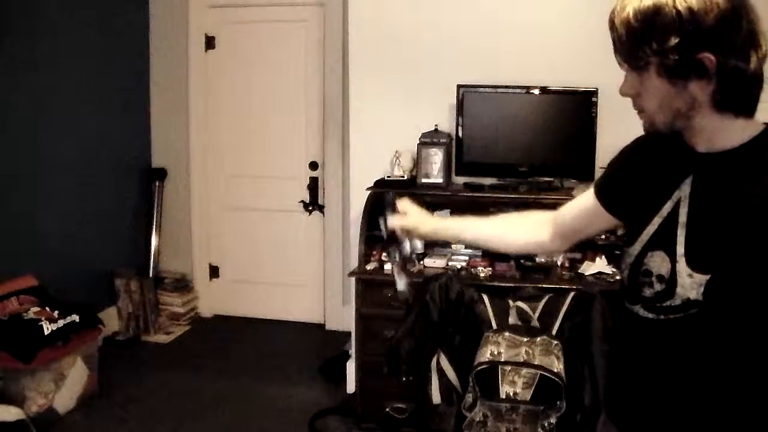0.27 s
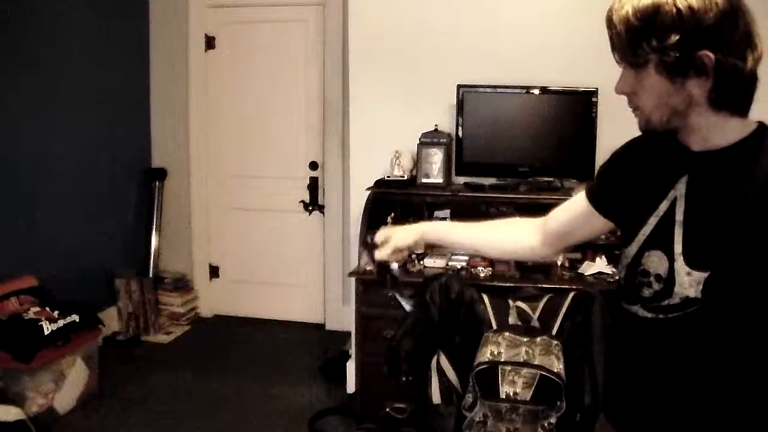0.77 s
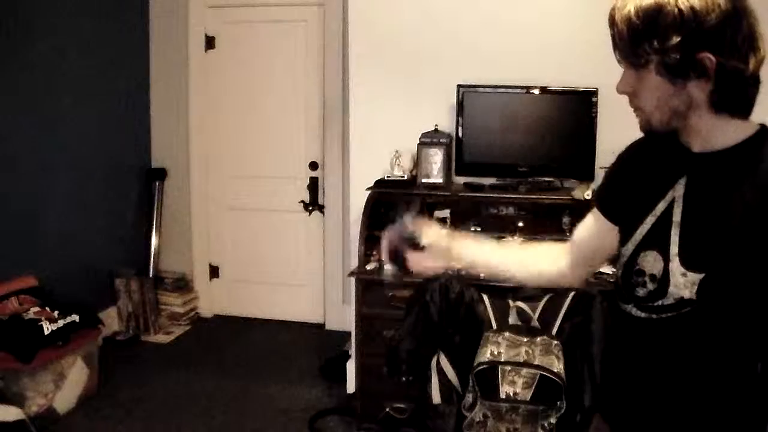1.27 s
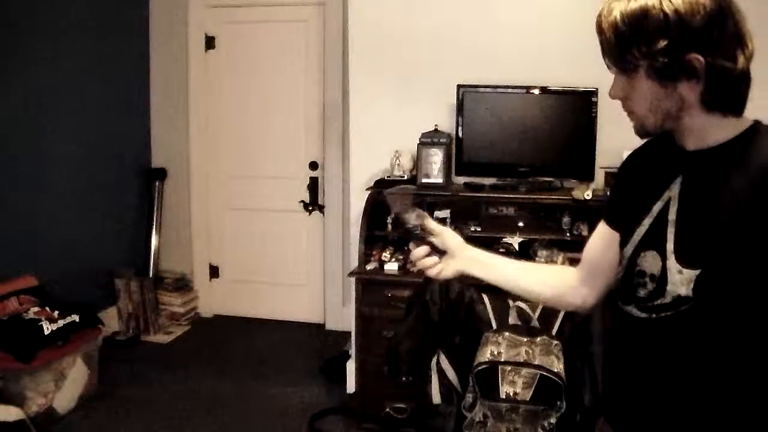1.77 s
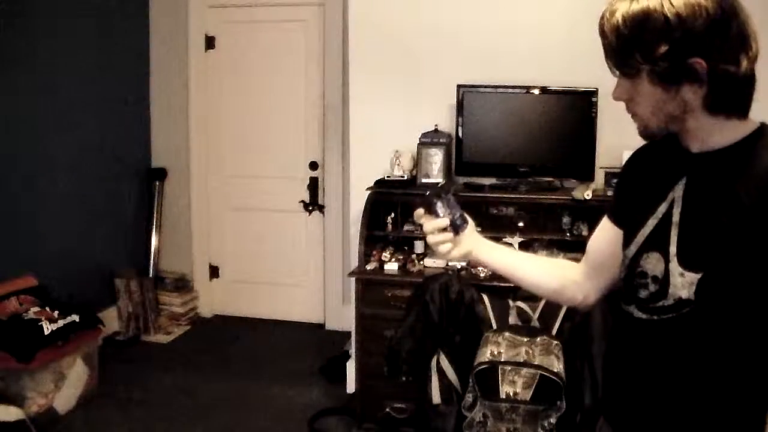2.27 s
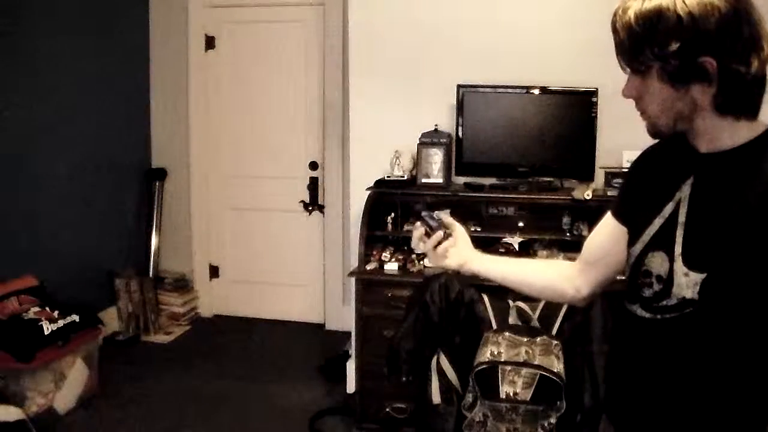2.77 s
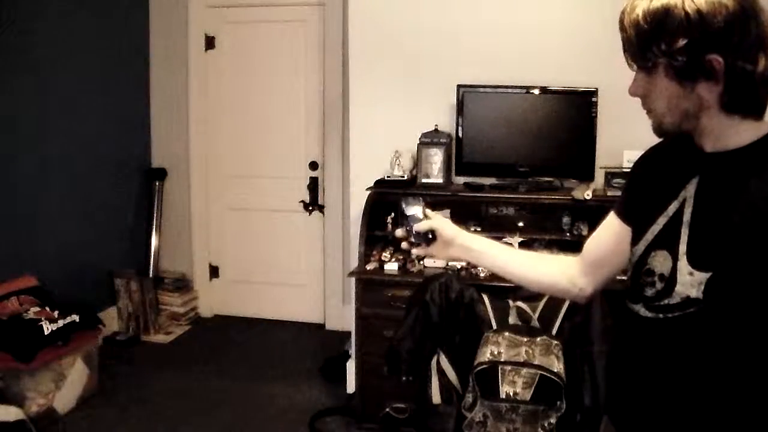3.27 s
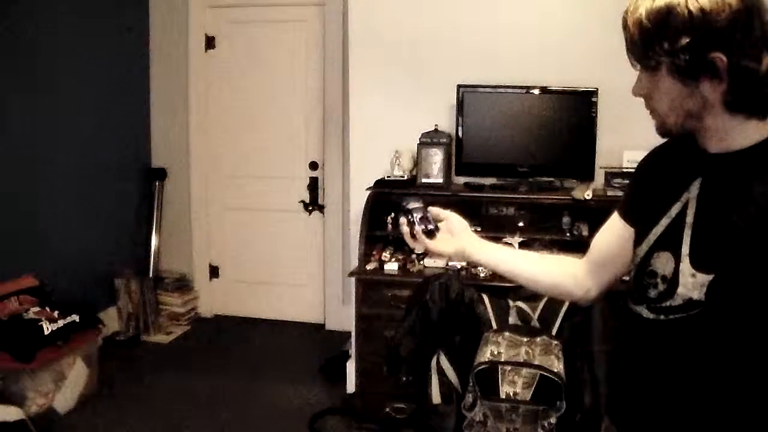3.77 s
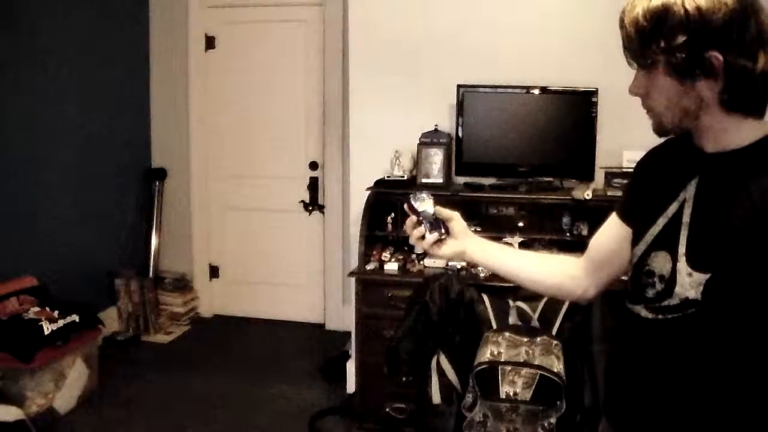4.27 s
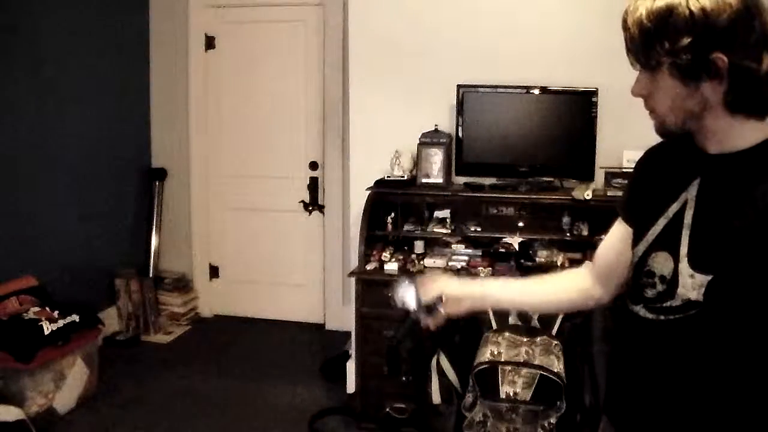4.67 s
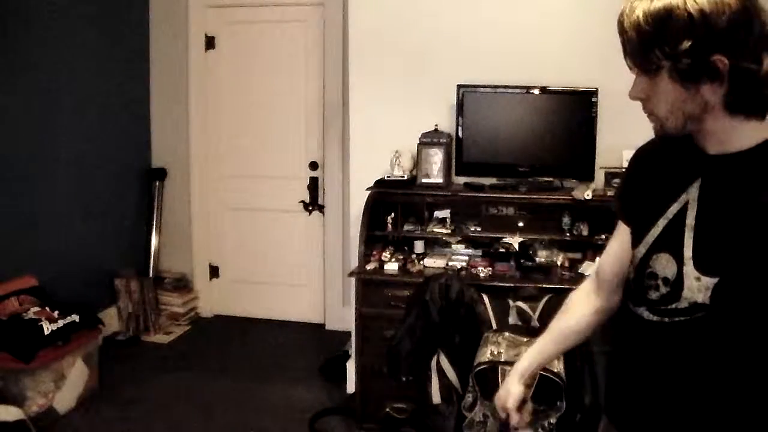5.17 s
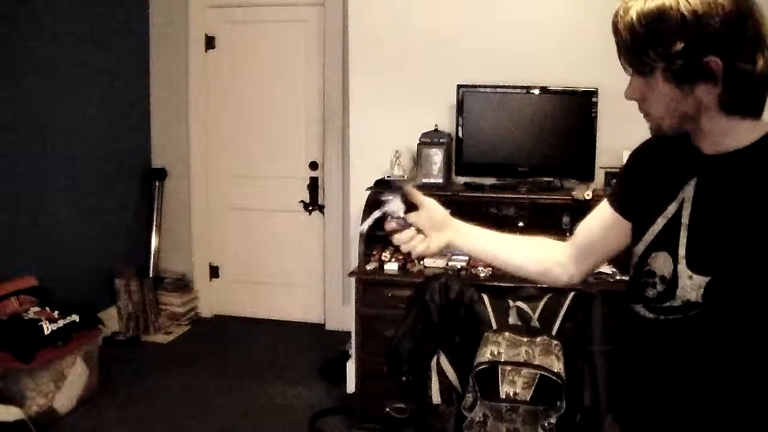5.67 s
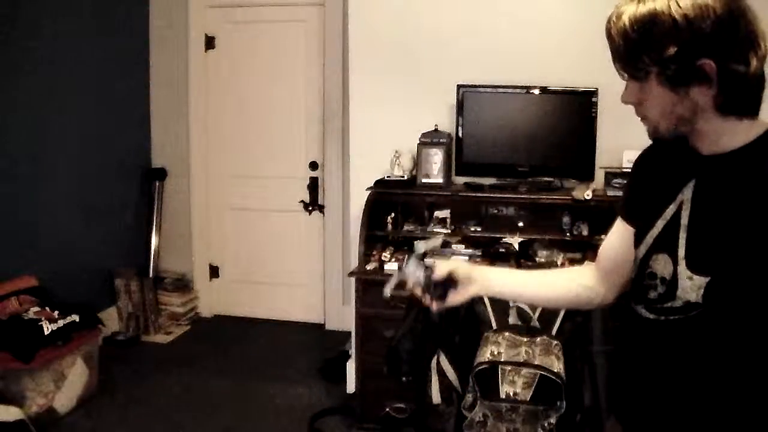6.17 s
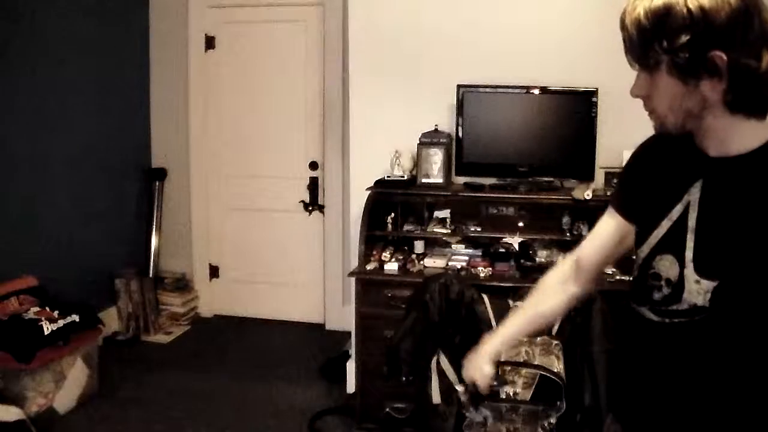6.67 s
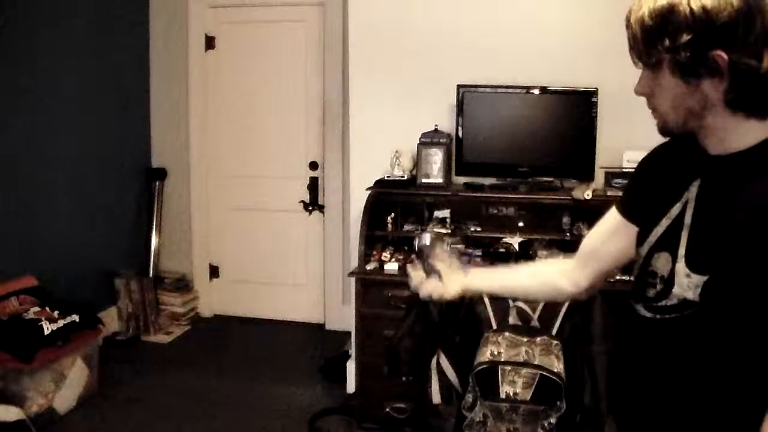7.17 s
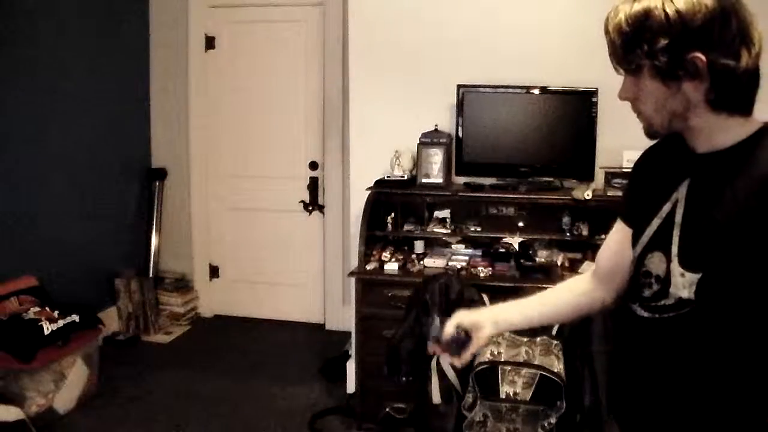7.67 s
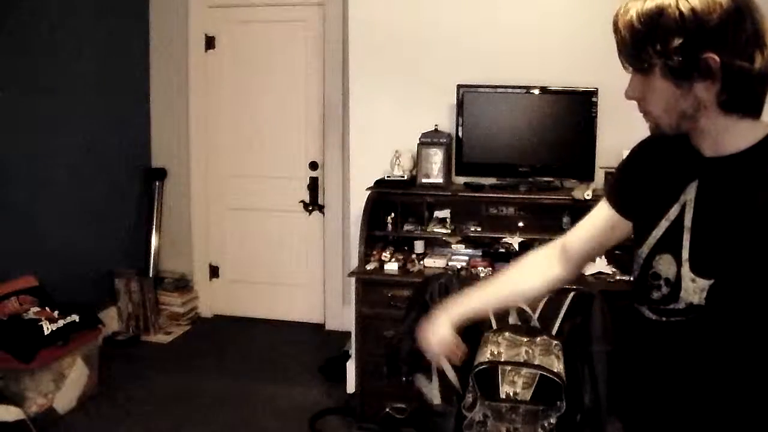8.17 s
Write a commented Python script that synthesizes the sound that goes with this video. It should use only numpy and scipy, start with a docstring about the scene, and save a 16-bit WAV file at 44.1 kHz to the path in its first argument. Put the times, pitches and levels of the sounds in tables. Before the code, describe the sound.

A hinged plastic toy is flipped open and shut by hand, clacking and rattling in quick bursts over a low room hum.

```python
"""A low machine hum and a rush of air fill a small room. A metre or two away, a hinged plastic toy is
flipped open and shut by hand: light clicks, then from 1.3 s a flurry of clacks, the loose hinge rattling
in the swings, up to a hard snap at 2 s with a dull wash after it. Sparser, hollower knocks follow, and the
parts tap in the fingers. Flat blows stop dead; glancing ones chatter. Two more hard snaps land at 5.9
and 7.3 s, the whole sound dipping briefly after each of the three, and a last click comes at 8.1 s."""
import sys
import numpy as np
from scipy import signal
from scipy.fft import rfft, irfft
from scipy.io import wavfile

SR = 44100
rng = np.random.default_rng(int(sys.argv[2]) if len(sys.argv) > 2 else 0)


def put_to_file(sound):
    """Save the sound as 16-bit audio at rate SR, in the file named by the first command-line argument."""
    columns = np.atleast_2d(sound).T  # one column per channel
    safe = np.clip(columns, -1, 1)
    whole_steps = np.round(safe * 32767)
    wavfile.write(sys.argv[1], SR, whole_steps.astype(np.int16))


N = 371322
TIME = np.arange(N) / SR
FREQS = np.fft.rfftfreq(N, 1 / SR)


def amp(db):
    """Decibels to gain."""
    return 10 ** (np.asarray(db) / 20)


def pan(left_db):
    """Stereo gains: the left goes up by left_db, the right down by as much."""
    return amp([[left_db], [-left_db]])


def curve_at(points, hz):
    """Reads a curve on a log-frequency axis."""
    point_hz, value = np.transpose(points)
    return np.interp(np.log(hz + 1), np.log(point_hz + 1), value)


def bell(hz, centre_hz, octaves):
    """An EQ bell of height 1."""
    return np.exp(-(np.log2((hz + 1) / centre_hz) / octaves) ** 2)


def add(mix, start_s, sounds):
    """Mixes sounds in at start_s."""
    part = mix[:, max(round(start_s * SR), 0):][:, :sounds.shape[1]]
    part += sounds[:, :part.shape[1]]


def noise(spectrum):
    """Two unrelated noises with the given spectrum, rms 1."""
    shaped = irfft(rfft(rng.standard_normal((2, N))) * spectrum, N)
    return shaped / np.sqrt(np.mean(shaped ** 2) + 1e-20)


def stereo(two, correlation):
    """Blends two unrelated signals, as mid and side, into left and right."""
    mid = two[0] * np.sqrt((1 + correlation) / 2)
    side = two[1] * np.sqrt((1 - correlation) / 2)
    return np.array([mid + side, mid - side])


# The tone of the air. Each row: frequency in Hz, relative spectral level in dB.
AIR_SPECTRUM = [(20, 4), (45, 2.5), (80, -7), (150, -8), (220, -5), (330, -6), (480, -9), (700, -10),
                (900, -12.5), (1500, -17.5), (3000, -22), (5000, -29), (14000, -80)]
# Its slow level ride. Each row: time in seconds, gain in dB.
AIR_RIDE = [(0, 1), (3.3, 0.5), (4.8, -0.1), (5.8, -1), (7.2, -1), (8.4, 0)]


def air(level_db=-54):
    """A dark, narrow bed of rushing air that drifts a little in level."""
    rush = amp(level_db) * noise(amp(curve_at(AIR_SPECTRUM, FREQS)))
    ride = amp(np.interp(TIME, *np.transpose(AIR_RIDE)))
    return stereo(rush * ride, correlation=0.82) * pan(-0.14)


# A running machine's resonances. Each row: centre in Hz, width in Hz, rms level in dB before panning.
HUM_BANDS = [(30.35, 5.4, -57.5), (58.3, 11, -61.5), (99.3, 8.5, -70.5), (308, 18, -67), (369.6, 13, -67),
             (421.6, 16, -68.5), (532, 14, -71.5), (717, 19, -66.5)]


def machine_hum():
    """Narrow resonant bands of noise make a wavering hum, almost mono."""
    power = 0
    for hz, width, db in HUM_BANDS:
        band = 1 / (1 + (2 * (FREQS - hz) / width) ** 2) ** 2
        power = power + amp(db) ** 2 * band / band.sum()
    hum = np.sqrt(power.sum()) * noise(np.sqrt(power))
    return stereo(hum, correlation=0.99) * pan(0.5)


# The tones of the machine's motor. Each row: pitch in Hz, rms level in dB before panning.
MOTOR_TONES = [(59, -60.5), (118.2, -64.5)]


def motor(wander_cycles=0.1):
    """A steady low drone to the left, its phase wandering a little."""
    wander_s = wander_cycles * noise(1 / (1 + FREQS ** 2))[0] / MOTOR_TONES[0][0]
    drone = sum(amp(db) * np.sin(2 * np.pi * hz * (TIME + wander_s)) for hz, db in MOTOR_TONES)
    return np.sqrt(2) * drone * pan(3)


def ticks(size, per_s, spread_db):
    """Impulses at random moments, of uneven force."""
    lands = rng.random(size) < per_s / SR
    force = amp(spread_db * np.clip(rng.standard_normal(size), -2, 2))
    return lands * force * rng.choice([-1, 1], size)


# The room's decay. Each row: frequency in Hz, time to fall 60 dB in seconds.
ROOM_DECAY = [(300, 0.12), (1200, 0.29), (2800, 0.39), (5500, 0.36), (9000, 0.35), (14000, 0.2)]


def room(sound, build_s=0.0017, early_db=-3, early_s=0.0043, mic_spacing_m=0.025):
    """Early reflections, then a diffuse tail that two close microphones share only below the treble."""
    t = np.arange(SR * 3 // 4) / SR
    early = np.array([ticks(len(t), per_s=500, spread_db=3) for _ in range(2)]) * np.exp(-t / early_s)
    echoes = rng.standard_normal((2, len(t))) + amp(early_db) * np.sqrt(SR / 500) * early
    fade_in = 1 - np.exp(-(t / build_s) ** 2)
    hz, age, bands = signal.stft(echoes * fade_in, SR, nperseg=256)
    wavelengths_apart = mic_spacing_m * hz[:, None] / 343
    decay = amp(-60 * age / curve_at(ROOM_DECAY, hz)[:, None])
    bands = stereo(bands, np.sinc(2 * wavelengths_apart)) * decay
    tail = signal.istft(bands, SR, nperseg=256)[1]
    return signal.fftconvolve(sound[None], tail / np.linalg.norm(tail.mean(0)), axes=1)[:, :N]


# The EQ of a plain plastic contact. Each row: frequency in Hz, gain in dB.
CONTACT_EQ = [(100, -18), (400, -18.5), (800, -16), (1300, -6), (1900, -7), (2700, -1), (4100, 1.5),
              (6000, 1), (8200, -7), (10500, -7), (14000, -11.5)]
BODY_HZ = 1966  # the toy's hollow note


def colour(edge_db, body_db=0, hinge_db=0, body_hz=BODY_HZ, edge_hz=7000, hinge_hz=2880, thump_hz=520):
    """A contact's filter: hollow body and thump if flat, bright edge if glancing, and the hinge's note."""
    hz = abs(np.fft.fftfreq(1024, 1 / SR))
    edge = 1 - 1 / (1 + (hz / edge_hz) ** 6)
    body = bell(hz, body_hz, octaves=0.53) + 0.33 * bell(hz, thump_hz, octaves=1.0)
    hinge = bell(hz, hinge_hz, octaves=0.24)
    eq_db = curve_at(CONTACT_EQ, hz) + edge_db * edge + body_db * body + hinge_db * hinge
    minimum_phase = np.exp(np.conj(signal.hilbert(np.log(amp(eq_db)))))  # no ring ahead of the hit
    return np.fft.ifft(minimum_phase).real


def ringing(level_db, light_touch_db=-52.5):
    """Ring gain in dB: light touches leave the parts free; hard blows press them together and damp them."""
    return -3 - 0.33 * max(level_db - light_touch_db, 0)


# The shell's modes. Each row: pitch in Hz, relative level in dB, time to fall 60 dB in seconds.
SHELL_MODES = [(1990, -28.5, 0.013), (2214, -34, 0.011), (2530, -26.5, 0.011), (2701, -25.5, 0.027),
               (2987, -33, 0.028), (3242, -28.5, 0.03), (3530, -24, 0.0093), (4680, -31, 0.027),
               (4950, -33.5, 0.027), (5440, -29.5, 0.019), (5828, -28, 0.052), (6800, -32, 0.03),
               (8300, -49, 0.011), (9740, -32, 0.087)]


def shell(blows, tone, ring_db, crack_s=0.0014, scatter_db=4, detune=0.012):
    """Blows crack and ring the plastic shell; returns four directions, each of energy 1."""
    t = np.arange(2048) / SR
    hz, db, t60 = np.transpose(SHELL_MODES)[:, :, None]
    place, grip = rng.standard_normal((2, len(SHELL_MODES), 1))
    envelopes = amp(ring_db + db + scatter_db * place - 60 * t / t60)
    ring = (envelopes * np.sin(2 * np.pi * hz * (1 + detune * grip) * t)).sum(0)
    # the crack's crowded, quickly damped modes add up differently in each direction
    crack_decay = np.exp(-2 * t / crack_s)
    crack_power = abs(signal.fftconvolve(blows ** 2, crack_decay / crack_decay.sum()))
    crack = np.sqrt(crack_power) * np.clip(rng.standard_normal((4, len(crack_power))), -2, 2)
    sounds = signal.fftconvolve(crack + signal.fftconvolve(blows, ring), tone[None], axes=1)
    return sounds / np.linalg.norm(sounds, axis=1, keepdims=True)


GLANCING_S, FLAT_S = 0.0073, 0.0023  # chatter decay of a light glancing blow and a light flat one
FLAT_DB, FLAT_RANGE_DB = 6.5, 3  # body boost at which a blow turns flat, and how gradually
HARD_DB, SNAP_DB = -22.5, -27  # a hard blow halves its chatter; a snap lifts the hollow note
HIT_GAIN = np.sqrt(SR / 100)  # makes a hit's level its rms over 10 ms


def contact(db, body_db, edge_db, rebound=0.56, soft_attack_s=0.0075, size=2048):
    """A blow, then chatter in the play of the hinge: the flatter and harder, the sooner it stops."""
    t = np.arange(size) / SR
    chatter_s = FLAT_S + (GLANCING_S - FLAT_S) / (1 + np.exp((body_db - FLAT_DB) / FLAT_RANGE_DB))
    chatter_s /= 1 + amp(db - HARD_DB) ** 2
    attack = 1 / (1 + (chatter_s / soft_attack_s) ** 4)  # long chatter starts softly
    envelope = (attack + (1 - attack) * 2 * t / chatter_s) * np.exp(-t / chatter_s)
    blows = attack * (t == 0) + rebound * ticks(size, per_s=1500, spread_db=4.9) * envelope
    # a hard snap is a shorter contact, so its hollow note sits higher
    rise_octaves = 0.26 / (1.5 + np.exp(SNAP_DB - db))
    tone = colour(edge_db, body_db, body_hz=BODY_HZ * 2 ** rise_octaves)
    return amp(db) * HIT_GAIN * shell(blows, tone, ringing(db))


# Changes of grip. Each row: start and end in seconds, middle tap level in dB, body boost in dB.
GRIP_CHANGES = [(2.685, 2.715, -54, -1), (3.738, 3.82, -56, 18), (4.248, 4.269, -50, 7),
                (4.725, 4.787, -47.5, 4), (5.729, 5.801, -54, -2), (7.093, 7.11, -45.5, 2),
                (7.699, 7.876, -54, 3)]


def grip_taps(per_s=20, spread_db=4):
    """The parts tap lightly and unevenly as the fingers change grip."""
    out = np.zeros((4, N))
    for start, end, db, body_db in GRIP_CHANGES:
        count = max(round((end - start) * per_s), 1)
        for k, (lag, force) in enumerate(rng.random((count, 2))):
            tap = contact(db + spread_db * (2 * force - 1), body_db, edge_db=-3.5)
            add(out, start + (end - start) * (k + lag) / count, tap)
    return out


# Hinge rattles, and one dull wash that lingers after the hard snap at 2 s as the level returns.
# Each row: start and end in seconds, level in dB, treble boost in dB.
RATTLES_AND_WASH = [(0.049, 0.688, -60.5, -4), (0.814, 0.989, -57, 2), (1.263, 1.451, -45.5, -1),
                    (1.576, 1.679, -45.5, 5), (1.685, 1.781, -42, 13), (1.83, 2.027, -51.5, 6.5),
                    (2.049, 2.294, -45.5, -20), (5.277, 5.43, -57, 0), (5.577, 5.671, -58.5, -9.5),
                    (5.853, 5.906, -30, 9), (7.125, 7.272, -48, -2.5), (7.321, 7.466, -49, 2),
                    (8.141, 8.243, -50, 1)]


def rattles_and_wash(gentle_db=-60, damping=0.4):
    """The loose hinge ticks densely on the shell, force damping its ring; dulled ticks make the wash."""
    out = np.zeros((4, N))
    for start, end, db, edge_db in RATTLES_AND_WASH:
        size = round((end - start) * SR)
        ticking = ticks(size, per_s=1000, spread_db=3.5) * signal.windows.tukey(size, 0.5)
        tone = colour(edge_db, hinge_db=10 - damping * (db - gentle_db))
        add(out, start, amp(db) * np.sqrt(size) * shell(ticking, tone, ringing(db) - 4))
    return out


def lead_in(blow_db, edge_db, swell_s=0.0055, middling_blow_db=-35, size=1024):
    """A faint swell of fine ticks leads into a clack and softens its attack; returns lead time, sound."""
    until_blow_s = np.arange(size)[::-1] / SR
    swell = ticks(size, per_s=2500, spread_db=2.5) * np.exp(-until_blow_s / swell_s)
    db = -49.5 + 0.84 * (blow_db - middling_blow_db)
    return until_blow_s[0], amp(db) * HIT_GAIN * shell(swell, colour(edge_db, hinge_db=5), ringing(db))


# Brief dips of the whole mix. Each row: start in seconds, depth in dB, hold and release in seconds.
LEVEL_DIPS = [(2.0453, 10, 0.017, 0.35), (5.9053, 14.5, 0.45, 0.12), (7.286, 6.5, 0.4, 0.24)]


def dip_gain(instant_share=0.59, fall_s=0.003):
    """The level drops, most of the way at once, holds, and comes back."""
    cut_db = 0
    for start, depth_db, hold_s, release_s in LEVEL_DIPS:
        corners = start + np.cumsum([-0.0005, 0.0005, fall_s, hold_s, release_s])
        cut_db = cut_db + depth_db * np.interp(TIME, corners, [0, instant_share, 1, 1, 0])
    return amp(-cut_db)


# The halves meeting. Each row: start in seconds, level in dB, body boost in dB, treble boost in dB.
CLACK_HITS = [(0.213, -48.5, -8, 0), (0.278, -43.5, -3.5, 4), (0.323, -44, 2, -4), (0.433, -47.5, -13, 1),
              (0.523, -49.5, 5, 2), (0.896, -45.5, -5, -4), (0.941, -47, -15, -2), (1.274, -38, -7, 8),
              (1.298, -37.5, -3, 4), (1.335, -39.5, -10, 10), (1.36, -35.5, 3, -9), (1.3817, -32, -3, 13),
              (1.399, -31, 0, 2.5), (1.568, -26.5, -4, 4.5), (1.611, -40, -3, -6), (1.695, -35, -8, -5),
              (1.732, -31.5, -5, 2), (1.824, -33.5, -7, 11), (1.998, -28, -3, 3.5), (2.0441, -27.5, 17, 1),
              (2.047, -24, 9, 3.5), (2.6279, -44, 5, -2), (2.844, -43, 31, -13), (2.8485, -35, 21, 5),
              (2.855, -32, 2, 5), (2.957, -35, 18.5, -3), (3.6508, -51.5, 10, -33),
              (4.074, -44.5, 14, -4.5), (4.0804, -38, 4.5, 3), (4.1523, -31, 14.5, -0.5),
              (4.7933, -34, 10, -3), (4.826, -29.5, 8, 2.5), (4.926, -28, 12.5, 7.5), (4.932, -36.5, 0, 15),
              (5.2038, -44, 12, -9), (5.212, -39.5, 0, 6), (5.2897, -40, 0, 3.5), (5.5357, -42.5, 7, -1),
              (5.5913, -45, 2.5, 1), (5.81, -46, -1.5, 1), (5.8568, -29, 3, 11), (5.905, -23, 8, 3.5),
              (6.535, -51.5, 3, 6), (6.912, -47, -2, 4), (6.9971, -42, 7, 2), (7.131, -44.5, 5, 10),
              (7.2031, -38, 4, 5), (7.2863, -26, 12, 2), (7.3075, -32, 7.5, -0.5), (7.4508, -29.5, 9, 3),
              (7.5395, -44, 15, -4), (8.149, -40, 2, 0.5)]


def clacks():
    """The halves knock together; a hit inside a dip is boosted so its attack keeps its level."""
    out = np.zeros((4, N))
    dip = dip_gain()
    for start, db, body_db, edge_db in CLACK_HITS:
        lead_s, swell = lead_in(db, edge_db)
        add(out, start - lead_s, swell)
        dip_at_attack = dip[round(start * SR) + SR // 1000]
        add(out, start, contact(db, body_db, edge_db) / dip_at_attack)
    return out


def scene(reverb_db=-4):
    """The toy straight on, its other three directions by way of the walls, over air, hum and motor."""
    direct, *aside = clacks() + rattles_and_wash() + grip_taps()
    reverb = amp(reverb_db) * sum(room(sound) for sound in aside) / np.sqrt(len(aside))
    return (direct + reverb) * pan(-0.27) + air() + machine_hum() + motor()


def record(dry, mic_hiss_db=-61.5, floor_db=-70, cutoff_hz=14300):
    """Microphone hiss dips with the scene, a fainter hiss stays steady, and a low-pass trims the top."""
    mic_hiss = amp(mic_hiss_db) * rng.standard_normal((2, N))
    steady_hiss = amp(floor_db) * rng.standard_normal((2, N))
    heard = (dry + mic_hiss) * dip_gain() + steady_hiss
    low_pass = signal.firwin(401, cutoff_hz, window=("kaiser", 8), fs=SR)
    return signal.oaconvolve(heard, low_pass[None], "same")


dry = scene()
out = record(dry)
put_to_file(out)
```